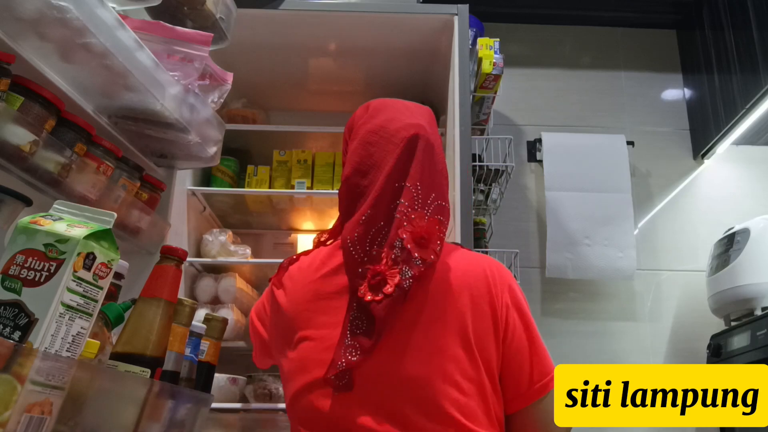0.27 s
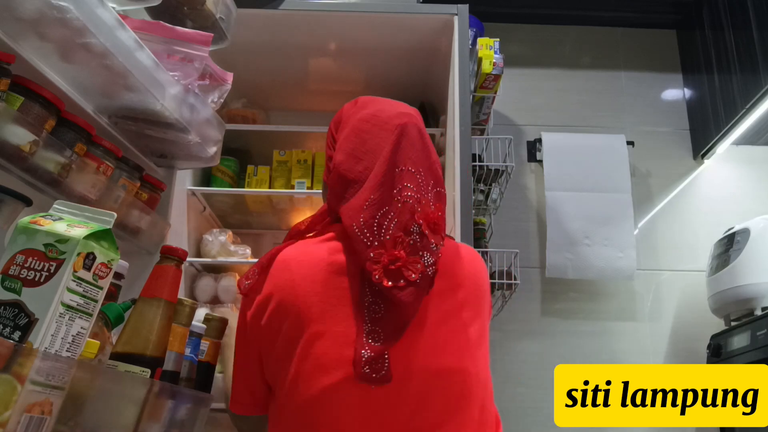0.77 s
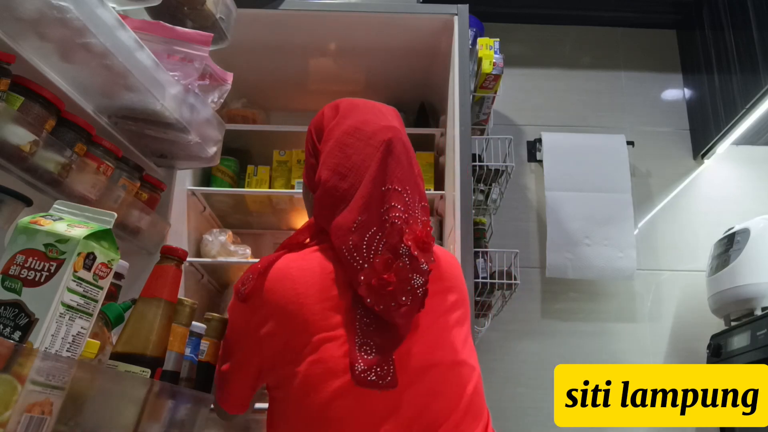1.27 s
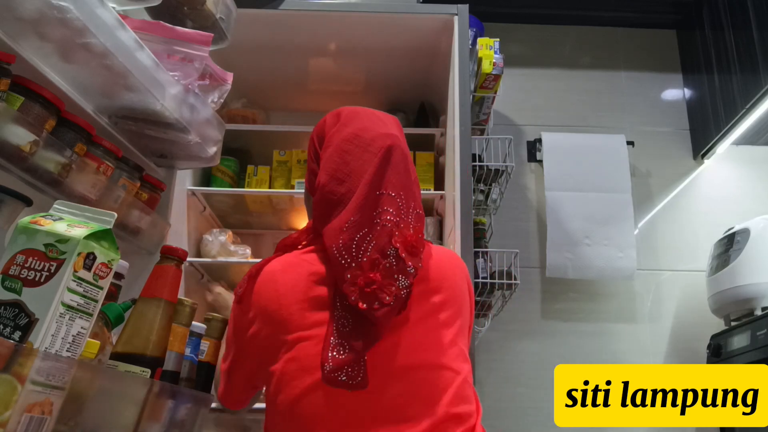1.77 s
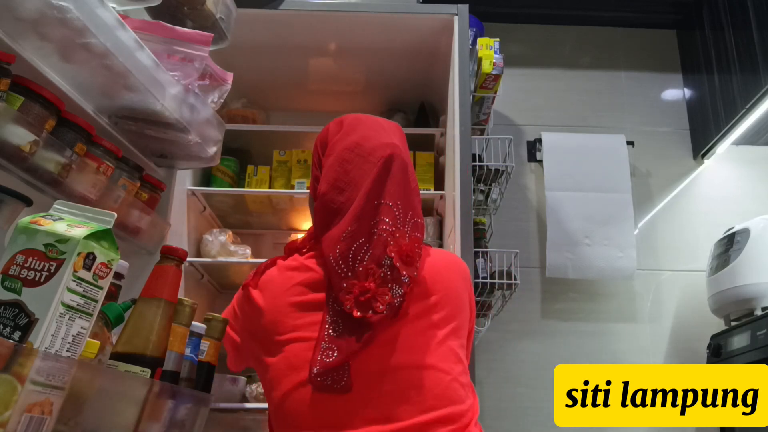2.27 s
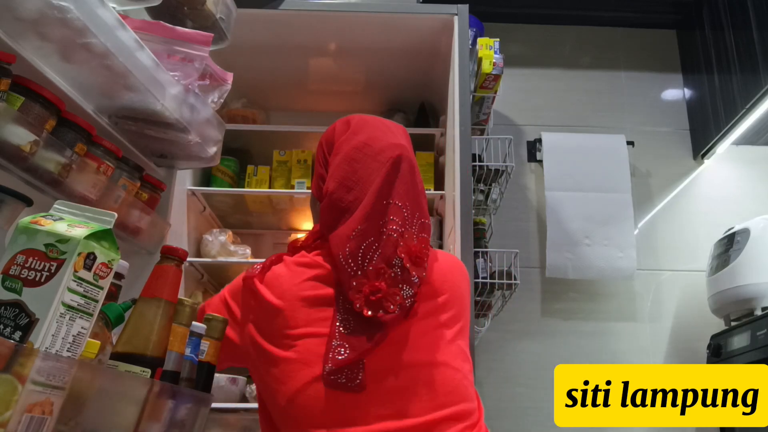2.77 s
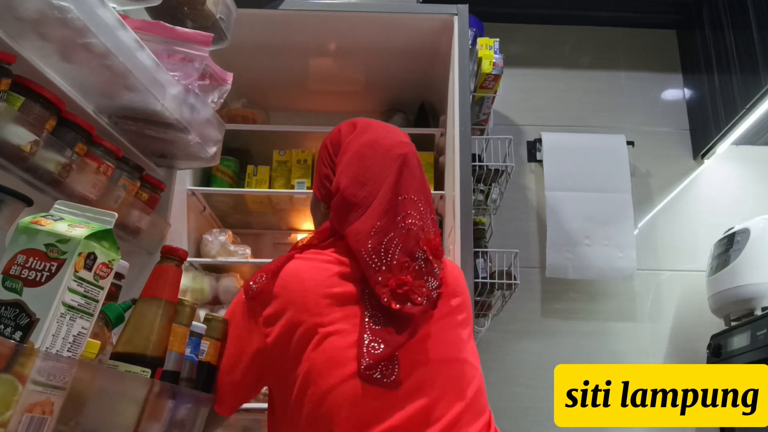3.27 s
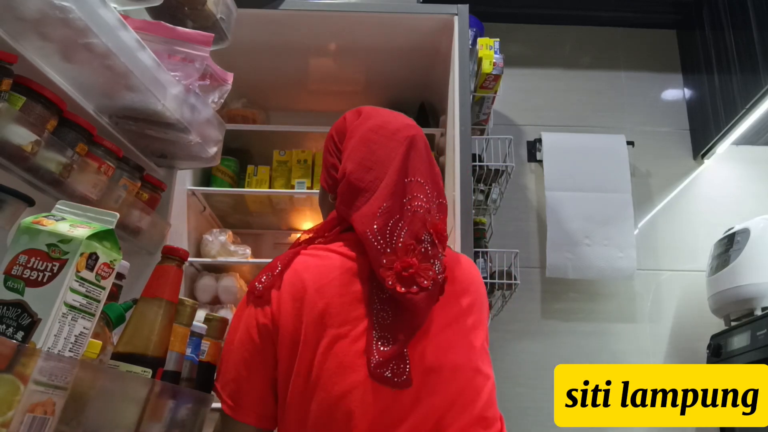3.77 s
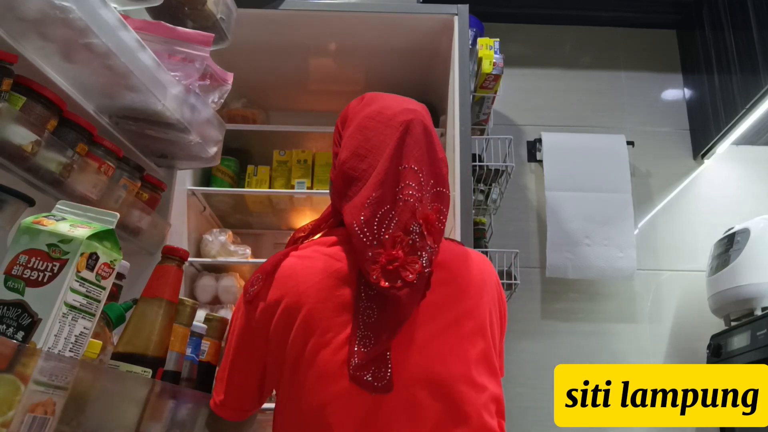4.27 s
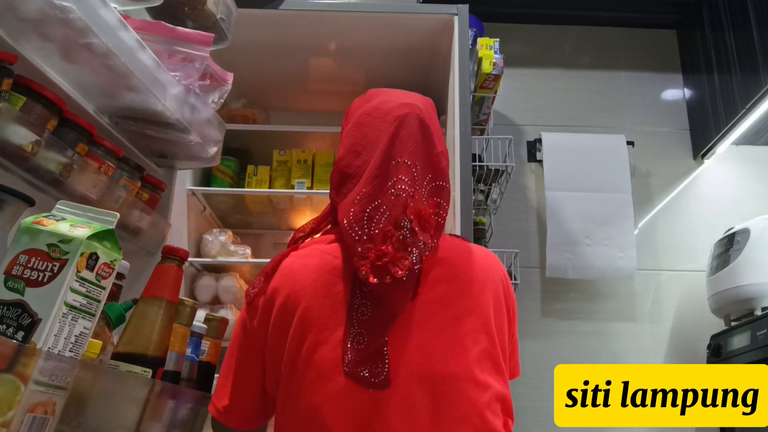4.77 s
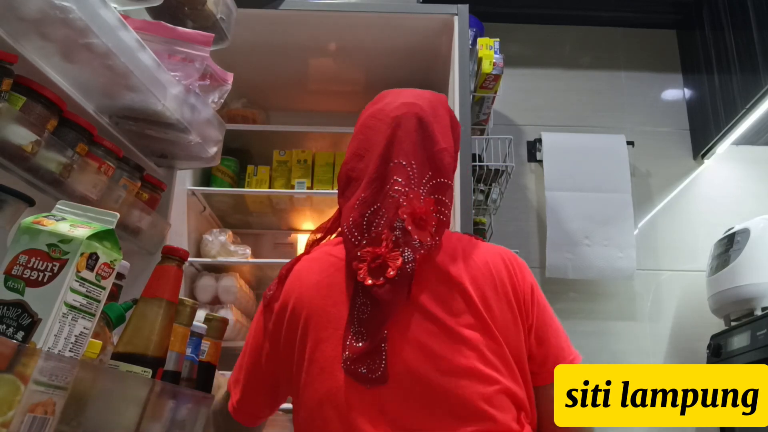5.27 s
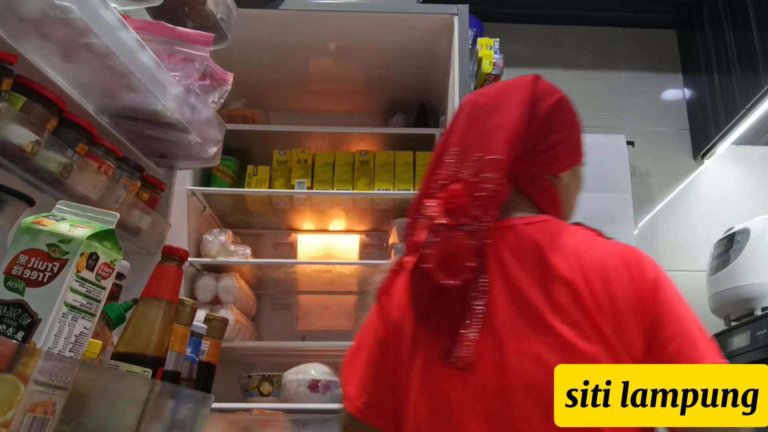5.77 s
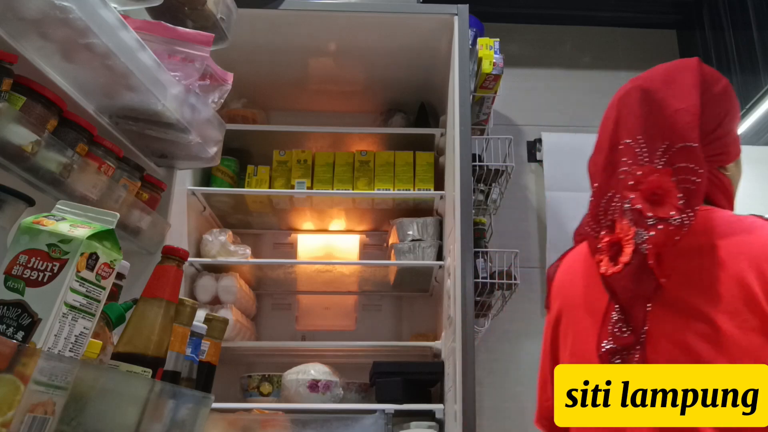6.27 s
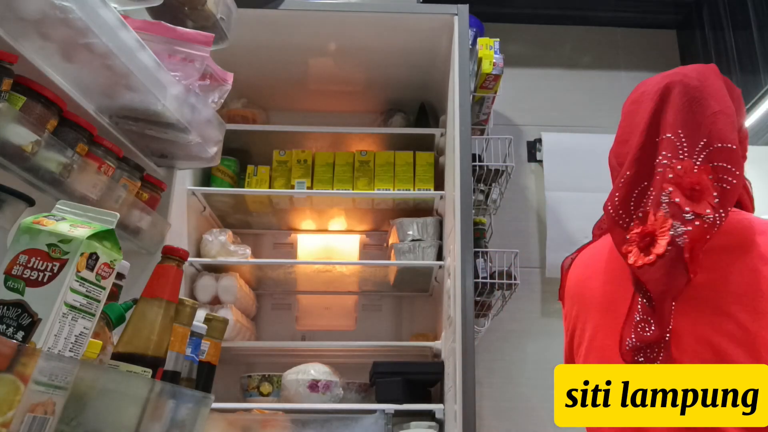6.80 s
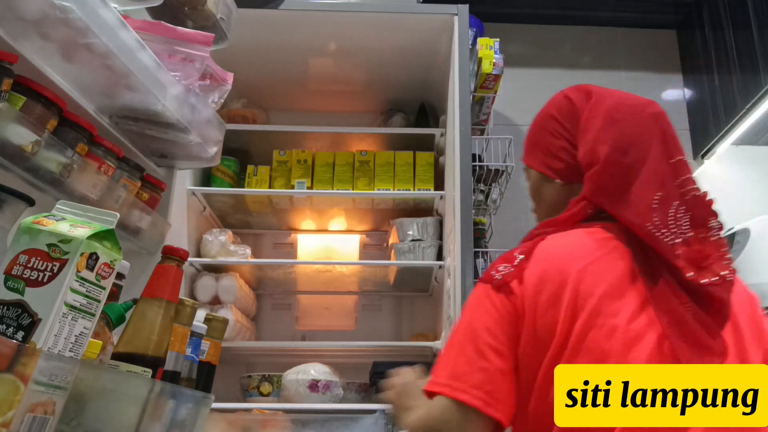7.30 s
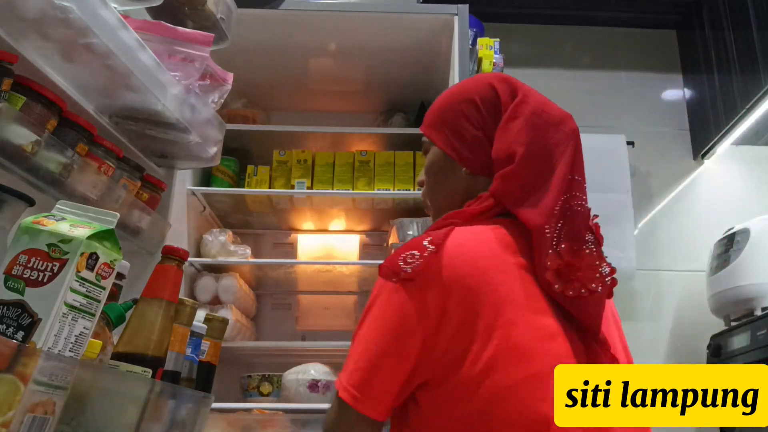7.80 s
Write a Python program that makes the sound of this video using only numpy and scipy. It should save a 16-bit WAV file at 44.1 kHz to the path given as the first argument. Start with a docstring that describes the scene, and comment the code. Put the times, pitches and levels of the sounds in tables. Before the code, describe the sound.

Someone moves containers around a refrigerator: scattered boxy plastic knocks, the strongest early on, gentle sliding and a brief squeaky scrape, then another cluster of knocks. Fine crackly rustles of plastic and cloth follow. Later a hard container lands and rocks with loud, dense, ringing cracks, leaving only tiny touches and soft hum. Heard closely in stereo from the fridge door, with short reflections from the small hard-walled kitchen.

```python
"""Plastic tubs knock and scrape on the shelves of an open fridge, with one small squeaky rub, made from
echoing taps, ringing notes and jerky friction. Bags and sleeves rustle as clouds of tiny crackles. Then
a hard container clatters down beside the fridge, as dense cracks with ringing tones. The compressor hums
as wavering sines over the noise of a fan, in a small tiled kitchen. Two microphones in the fridge door
hear it in stereo."""
import sys
import numpy as np
from scipy import signal
from scipy.fft import rfft, irfft, next_fast_len
from scipy.io import wavfile
from scipy.ndimage import uniform_filter1d

SR = 44100
rng = np.random.default_rng(int(sys.argv[2]) if len(sys.argv) > 2 else 0)


def materialize(psi):
    """Save the field psi as 16-bit PCM at rate SR to the path in sys.argv[1].

    A 1-D psi becomes a single channel; in a 2-D psi each row is a channel.
    """
    bounded = np.clip(np.atleast_2d(psi).T, -1, 1)
    quanta = np.round(bounded * 32767).astype(np.int16)
    wavfile.write(sys.argv[1], SR, quanta)


N = 354652
TIME = np.arange(N) / SR
RING_TIME = TIME[:SR // 2]  # every echo and note lasts half a second at most

# How much the two microphones differ. Each row: pitch in Hz, side (difference) over mid (sum) in dB.
SIDE_OVER_MID = [(60, -16), (300, -14.5), (600, -1.5), (800, -9.5), (1050, 7.5), (2000, -2), (3500, 0.5)]


def tubs():
    """Plastic tubs knock with a ringing note, judder along the shelves and rub against each other."""
    # Tubs knocking on shelves, and one small squeaky rub. Each row: start in seconds, level in dB before
    # colouring, then thump, clack and tick in dB relative to it, ringing note in Hz,
    # note in dB relative to the level.
    knocks = [(0.092, -24.5, -8.5, -7.5, -12.5, 340, -6), (0.124, -27, -12.5, -2.5, -7, 285, 4),
              (0.331, -35, -12, -7.5, -6.5, 605, -12), (0.634, -32, -7.5, -6.5, -19, 376, -16),
              (0.992, -40.5, -2, -6.5, -13.5, 2360, -3.5), (1.028, -46.5, 7.5, -34, -30, 277, 11.5),
              (1.112, -46, 0, -7.5, -30, 283, 8), (1.264, -25, -11.5, -7.5, -4.5, 276, -6),
              (1.519, -32.5, -11, -7.5, -25, 307, -1.5), (1.595, -36, -31, -1, 12.5, 620, -15),
              (1.659, -18, -13, -6.5, -11, 328.4, 1), (1.675, -20, -25, 0.5, -3, 1154, 5),
              (1.682, -33, -11, -2, -11, 3890, 11.5), (1.979, -30.5, -5.5, 0, -3.5, 230, -19),
              (2.263, -28.5, -9, -12.5, -12.5, 573, 4.5), (2.268, -31.5, -17, -17, -27, 400.5, 7.5),
              (2.536, -40.5, 3, -4.5, -15, 305, -8), (2.716, -35, -7, -4, -9, 253, -3),
              (2.996, -36, -18, -8, -45, 905, -2), (3.209, -28, -33, -7, -10, 857, 1),
              (3.312, -32, 1, -3, -5, 886, 8), (3.342, -33.5, -5, -3.5, -12, 236, 1.5),
              (3.540, -38, -35, -12.5, -28, 866, 2.5), (3.685, -41, 3, -7, -9, 296, -2),
              (3.876, -47.5, 6, -20, -25, 106, 9), (4.268, -31.5, -13, -4.5, -30, 826, 2),
              (4.320, -29.5, -4, -3, -32, 287, 8), (4.336, -27.5, -13, -2.5, -15, 2207, 3.5),
              (4.346, -21.5, -11, -6.5, -21, 479, 6.5), (4.588, -48, -5, 0, -22, 1930, 2),
              (5.147, -52, -15, -17, 10.5, 970, 2), (5.158, -44, -21, -17, -10, 478, 16.5),
              (6.283, -61, -3, 10.5, -2, 3500, 20), (7.430, -44.5, -10, -16, -32, 440, -1.5),
              (7.900, -54.5, 16, -15, -22, 146, 4)]
    # Tubs pushed along a shelf. Each row: start in seconds, length in seconds, level in dB before
    # colouring, then thump, clack and tick in dB relative to it.
    scrapes = [(0.115, 0.062, -26, -6.5, -5, -6), (1.689, 0.082, -38.5, 6, -2, -10),
               (1.967, 0.035, -34.5, -1.5, 3, -9), (3.219, 0.13, -36.5, -7, -7, -9),
               (3.284, 0.0434, -25, -14, -3.5, -11.5), (4.312, 0.047, -21.5, -15, -3.5, -20.5),
               (7.536, 0.02, -52, -4, -2, 3), (7.95, 0.088, -56.5, -4, 3.5, -1)]
    # Tubs and packets eased gently over a shelf. Each row: start in seconds, swell in seconds,
    # length before the release in seconds, level in dB before colouring.
    slides = [(0.15, 0.05, 0.088, -48), (0.32, 0.032, 0.1, -50), (0.56, 0.057, 0.062, -56),
              (1.08, 0.16, 0.74, -50), (2.52, 0.24, 0.93, -51), (3.13, 0.066, 0.26, -46),
              (3.52, 0.037, 0.14, -57.5), (5.17, 0.058, 0.076, -56.5), (7.55, 0.31, 0.43, -60)]
    # Tone colour of the tubs. Each row: pitch in Hz, gain in dB.
    tub_colour = [(30, -17.5), (70, 6), (160, 18.5), (270, 14.5), (420, 15), (650, 9), (930, 10), (1200, 9),
                  (1500, 5.5), (2200, 3.5), (4500, 1.5), (9000, -2.5), (16000, -4.5)]

    contacts, notes = np.zeros((2, N)), np.zeros((2, N))
    for s, db, thump_db, clack_db, tick_db, note_hz, note_db in knocks:
        knock = shell(echoes(near_t60=0.2, room_t60=0.33, room_db=-4, rise_s=0.002))
        add(contacts, s, contact(knock, db, thump_db, clack_db, tick_db))
        # low notes ring longer than high ones
        ringing = note(note_hz, t60=0.16 * np.sqrt(400 / note_hz))
        add(notes, s, ringing * amp(db + note_db))

    for s, length, db, thump_db, clack_db, tick_db in scrapes:
        count = int(length * SR)
        force = slips(count, rate=500, spread_db=1) * np.sqrt(np.hanning(count))
        scrape = shell(spread(force, echoes(near_t60=0.089, room_t60=0.23, room_db=-7.5)))
        add(contacts, s, contact(scrape, db, thump_db, clack_db, tick_db))

    rub = crackle(rate=81, spread_db=4, t60=0.39) * strokes(slides, release_db_per_s=74)
    rub = contact(rub, db=5.5, thump_db=-7.0, clack_db=-5, tick_db=-20.5)
    return notes + tint(contacts + rub, tub_colour)


def compartment(x, ring_db, t60):
    """The air in the open fridge adds a boxy ring to the sound made inside it."""
    # Air resonances of the fridge. Each row: pitch in Hz, level in dB relative to the shared ring level.
    cavity = [(165, 1), (243, -1), (323, -18), (400, -10), (445, -2.5), (567, 1), (610, 5.5)]
    modes = sum(note(hz, t60) * amp(db) for hz, db in cavity)
    mono = x.mean(axis=0)[None]
    ring = signal.fftconvolve(mono, modes, axes=1)[:, :N]
    return x + amp(ring_db) * ring


def hard_container():
    """Each landing gives a dense crack and rings the container's modes, newly weighted as it rocks."""
    # The container landing and rocking. Each row: start in seconds, level in dB before colouring,
    # then thump, clack and tick in dB relative to it, ring in dB, time constant of the rise in seconds,
    # time for the close echoes of the crack to die by 60 dB in seconds.
    clatter = [(6.572, -17.5, -30, 2, -2, -1.5, 0.0042, 0.23),
               (6.618, -8, -11, -1.5, -30, -21.5, 0.00092, 0.062),
               (6.633, -18.5, 6, -7.5, -22, -8.5, 0.0031, 0.091),
               (6.694, -23, -18, -8, -10, -4, 0.0042, 0.42), (6.746, -13, -5, -9, -16.5, -21, 0.0031, 0.16),
               (6.816, -12, -19, -0.5, -15, -6, 0.0044, 0.13)]
    # Tones the container can ring at. Each row: pitch in Hz, level in dB before each landing's weighting,
    # time to die by 60 dB in seconds.
    container_modes = [(178.8, -7.5, 0.53), (750, -7, 0.21), (844, -3, 0.24), (938, 1.5, 0.23),
                       (947, -4.5, 0.34), (1100, -14, 0.16), (1267, -10.5, 0.35), (1420, -8, 0.17),
                       (1460, -9, 0.086), (1714, -11, 0.19), (1823, -6, 0.16), (2070, -2.5, 0.15),
                       (2235, -12, 0.14), (2306, -6, 0.12), (3320, -7, 0.18), (3580, -26.5, 0.36),
                       (3874, -19, 0.23), (4092, -17, 0.29), (4510, -13, 0.165), (4520, -15, 0.23),
                       (5800, -10, 0.22), (6430, -14, 0.18), (6640, -14, 0.17), (7370, -18, 0.12),
                       (9100, -27, .14), (9600, -16, 0.18), (11400, -27, 0.1)]
    # Tone colour of the crack. Each row: pitch in Hz, gain in dB.
    crack_colour = [(30, -13), (70, 9.5), (120, 12), (170, 18.5), (250, 14), (330, 7.5), (600, 10),
                    (1000, 14.5), (1300, 12.5), (2000, 6), (3000, 0.5), (5500, 1.5), (9000, -0.5),
                    (16000, -11)]

    out = np.zeros((2, N))
    modes = np.array([note(hz, t60) * amp(db) for hz, db, t60 in container_modes])
    for s, db, thump_db, clack_db, tick_db, ring_db, rise_s, t60 in clatter:
        crack = shell(echoes(near_t60=t60, room_t60=0.33, room_db=-5.5, rise_s=rise_s), ripple_db=5.0)
        crack = tint(crack, crack_colour)
        # every landing strikes the modes a little differently
        mode_gains = amp(1.4 * rng.uniform(-1.1, 1, len(modes)))
        weights = mode_gains * rng.choice([-1, 1], len(modes))
        ring = np.tensordot(weights, modes, axes=1) * amp(ring_db)
        add(out, s, contact(crack + ring, db, thump_db, clack_db, tick_db, tick_hz=5460))
    return out


def rustle():
    """Thin plastic and cloth shed dense fine crackles with every stroke."""
    # Strokes of sleeves and bags, as the body moves or an arm brushes past. Each row: start in seconds,
    # swell in seconds, length before the release in seconds, level in dB before colouring.
    swishes = [(0.22, 0.041, 0.46, -66.5), (0.57, 0.03, 0.038, -60), (1.15, 0.096, 0.53, -56),
               (1.44, 0.14, 0.3, -52), (2.08, 0.072, 0.67, -69), (2.52, 0.025, 0.81, -60),
               (2.64, 0.11, 0.26, -60.5), (3.2, 0.03, 0.2, -55), (1.92, 0.04, 0.06, -63),
               (3.45, 0.14, 0.21, -66.5), (3.675, 0.016, 0.015, -58.5), (4.165, 0.06, 0.19, -54.5),
               (4.36, 0.033, 0.033, -51), (4.532, 0.033, 0.19, -55), (4.82, 0.076, 0.078, -47),
               (4.915, 0.033, 0.031, -51), (4.98, 0.03, 0.3, -69), (5.1, 0.016, 0.099, -64),
               (5.275, 0.047, 0.185, -54.5), (5.51, 0.025, 0.072, -63), (5.56, 0.05, 0.42, -67.5),
               (5.955, 0.029, 0.037, -55.5), (6.05, 0.063, 0.25, -60.5), (6.14, 0.071, 0.086, -56.5),
               (6.31, 0.036, 0.285, -66.5), (7.52, 0.02, 0.025, -66), (7.1, 0.69, 0.94, -73)]
    # Tone colour of thin plastic and cloth. Each row: pitch in Hz, gain in dB.
    film_colour = [(100, -55.5), (900, 8), (2000, 4), (4500, 7.5), (9000, 9), (16000, 10.5)]
    cloth_rest_db = -76.5  # clothes never lie quite still

    gain = np.hypot(strokes(swishes, release_db_per_s=221), amp(cloth_rest_db))
    return tint(crackle(rate=1900, spread_db=2.0, t60=0.051) * gain, film_colour)


def kitchen():
    """Compressor tones waver in level and phase over the soft rush of a fan."""
    # Compressor tones. Each row: pitch in Hz, middle level in dB (RMS).
    compressor_tones = [(65, -96), (99.7, -64.5), (160, -63.5), (239, -65), (452, -65), (567, -74.5)]
    # Tone colour of the fan noise. Each row: pitch in Hz, gain in dB.
    fan_colour = [(20, -77), (32, -54), (48, -48.5), (65, -36), (100, -34), (125, -41), (170, -37.5),
                  (300, -38.5), (450, -39), (540, -42), (930, -45), (1100, -50), (2200, -60), (5000, -71),
                  (16000, -78)]

    hum = np.zeros(N)
    for hz, db in compressor_tones:
        level = np.sqrt(2) * amp(db + 2 * walk(3.56))
        phase = 2 * np.pi * hz * TIME + 1.18 * walk(5.3)
        hum += level * np.sin(phase)
    fan = tint(diffuse(N) * amp(0.26 * walk(27)), fan_colour)
    return hum + fan


def echoes(near_t60, room_t60, room_db, grain_db=6, rise_s=0.00095):
    """Answer to one tap: uneven reflections from close walls, plus the smooth tail of the kitchen."""
    count = len(RING_TIME)
    # a new random strength every 32 samples makes the close reflections uneven
    strength = amp(grain_db * np.repeat(rng.uniform(-1, 1, count // 32 + 1), 32)[:count])
    strength = strength / np.sqrt(np.mean(strength ** 2))
    near = diffuse(count) * strength * fade(near_t60)
    tail = diffuse(count) * fade(room_t60) * amp(room_db)
    return (near + tail) * (1 - np.exp(-RING_TIME / rise_s)) ** 2


def contact(x, db, thump_db, clack_db, tick_db, tick_hz=8500):
    """Set a contact's level, and its bass (thump), upper middle (clack) and treble (tick)."""
    # heavy contacts have more bass, hard ones more treble
    points = [(150, thump_db), (320, 0), (900, 0), (1400, clack_db), (3000, clack_db), (tick_hz, tick_db)]
    return amp(db) * tint(x, points)


def shell(x, ripple_db=4):
    """Every spot on a thin wall favours its own pitches: a new random ripple across the spectrum."""
    hz = np.geomspace(450, 14000, 120)
    return tint(x, np.column_stack([hz, ripple_db * rng.uniform(-1.42, 1, len(hz))]))


def note(hz, t60):
    """One resonance swells and dies; its phase differs between the microphones by the side table."""
    side = amp(np.interp(hz, *np.transpose(SIDE_OVER_MID)))
    phase = 2 * np.pi * (hz * RING_TIME + rng.random())
    phase = phase + np.arctan(side) * np.array([[1], [-1]])
    return np.sin(phase) * fade(t60) * (1 - np.exp(-RING_TIME / 0.0028))


def slips(count, rate, spread_db):
    """Sticking and slipping: about rate jerks a second, of uneven size, scaled to unit power."""
    chance, size = rng.random(count), rng.standard_normal(count)
    happens = chance < rate / SR
    jerks = happens * amp(spread_db * size) * rng.choice([-1, 1], count)
    return jerks / np.sqrt(np.mean(jerks ** 2) + 1e-12)


def spread(force, response):
    """Send a force through a two-channel response scaled to unit mean energy, to keep its power."""
    return signal.fftconvolve(force[None], response / np.sqrt(np.sum(response ** 2) / 2), axes=1)


def crackle(rate, spread_db, t60):
    """Many tiny random contacts, each smeared into a dying burst of noise by the walls."""
    power = signal.fftconvolve(slips(N, rate, spread_db) ** 2, fade(t60) ** 2)[:N]
    return diffuse(N) * np.sqrt(np.abs(power) / np.mean(power))


def strokes(rows, release_db_per_s):
    """Gain of movements: each gathers speed, holds and dies away, all with wavering pressure."""
    power = np.zeros(N)
    for s, swell_s, length, db in rows:
        age = TIME - s
        swell = np.clip(age / swell_s, 0, 1)
        level = amp(db - release_db_per_s * np.maximum(age - length, 0))
        power += (swell * level) ** 2  # overlapping strokes add in power
    return np.sqrt(power) * amp(0.8 * walk(18))


def diffuse(count):
    """Unit noise arriving from all sides, shared between the microphones as the side table says."""
    size = next_fast_len(count, real=True)
    hz, db = np.transpose(SIDE_OVER_MID)
    ratio = amp(np.interp(np.arange(size // 2 + 1) * SR / size, hz, db))
    mid, side = rfft(rng.standard_normal((2, size)))
    pair = np.array([mid + ratio * side, mid - ratio * side])
    return irfft(pair / np.hypot(1, ratio), size)[:, :count]


def tint(x, points):
    """Colour a sound through (Hz, dB) points with a causal filter built from the cepstrum of its gain."""
    size = 4096
    hz, db = np.transpose(points)
    grid = np.maximum(np.arange(size // 2 + 1) * SR / size, 1)
    cepstrum = irfft(np.log(amp(np.interp(np.log(grid), np.log(hz), db))))
    # folding the cepstrum makes the filter answer at once, with no sound ahead of its input
    cepstrum[1:size // 2] *= 2
    cepstrum[size // 2 + 1:] = 0
    taps = irfft(np.exp(rfft(cepstrum)))
    return signal.oaconvolve(np.atleast_2d(x), taps[None], axes=1)[:, :x.shape[-1]]


def fade(t60):
    """Ring-down by 60 dB in t60 seconds."""
    return amp(-60 * RING_TIME / t60)


def walk(rate):
    """Slow smooth wandering around 0, with about rate random turns a second and a spread near 0.8."""
    hold = max(int(SR / rate), 1)
    return uniform_filter1d(np.repeat(rng.standard_normal(N // hold + 1), hold), hold)[:N]


def add(out, s, sound):
    """Mix a sound in at s seconds."""
    start = max(int(s * SR), 0)
    part = sound[:, :max(N - start, 0)]
    out[:, start:start + part.shape[1]] += part


def amp(db):
    """Decibels to gain."""
    return 10 ** (np.asarray(db) / 20)


def scene():
    """All sources at the two microphones; only the tubs sound through the fridge compartment."""
    fridge = compartment(tubs(), ring_db=-53, t60=0.18)
    return fridge + hard_container() + rustle() + kitchen()


def record(dry):
    """The microphone ports resonate, each a little differently, and the top is cut."""
    # Colour of both microphones. Each row: pitch in Hz, gain in dB.
    mic_colour = [(1000, -2), (2300, 2), (3000, -1.5), (3800, 6), (4400, 5), (5200, -3), (6700, 1.5),
                  (8000, -7), (9000, -1), (10000, 5), (10800, 6.5), (11800, -5), (15500, -12.5)]
    # How they differ. Each row: pitch in Hz, left over right in dB.
    balance = [(60, -5), (200, 0), (1600, 0.5), (2600, 0), (4000, 10), (6000, 1), (8000, 0), (14000, -2.5)]

    left, right = tint(dry, mic_colour)
    left = tint(left, [(hz, db / 2) for hz, db in balance])
    right = tint(right, [(hz, -db / 2) for hz, db in balance])
    top_cut = signal.ellip(10, .1, 80, 15800, fs=SR, output="sos")  # steep cut above 15800 Hz
    return signal.sosfilt(top_cut, np.vstack([left, right]))


dry = scene()
out = record(dry)
materialize(out)
```